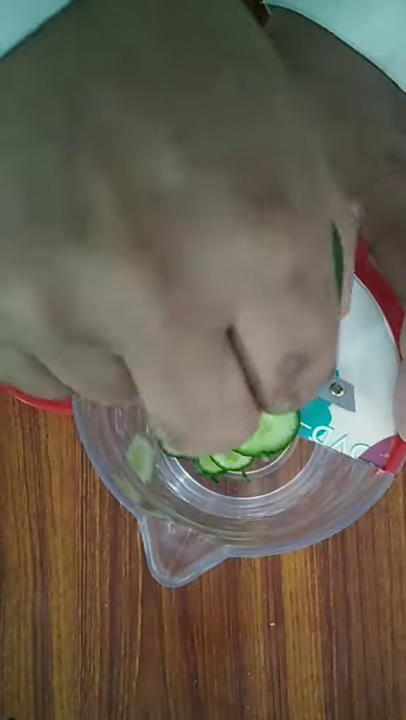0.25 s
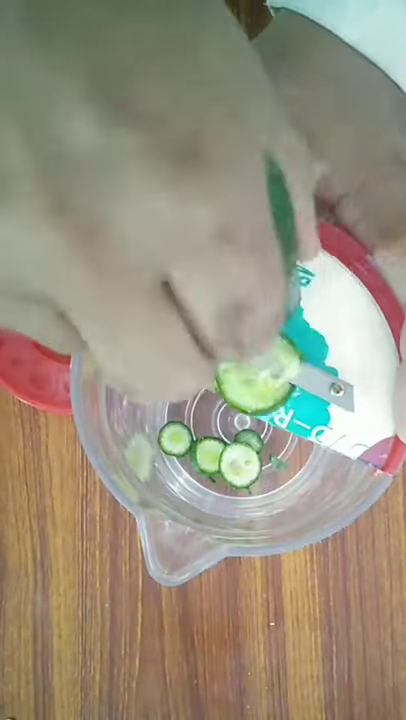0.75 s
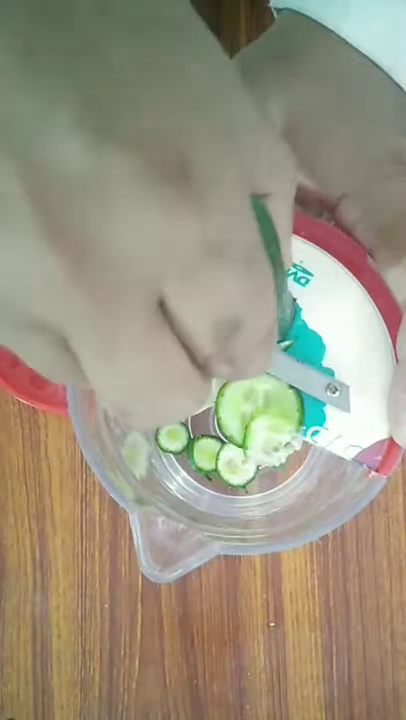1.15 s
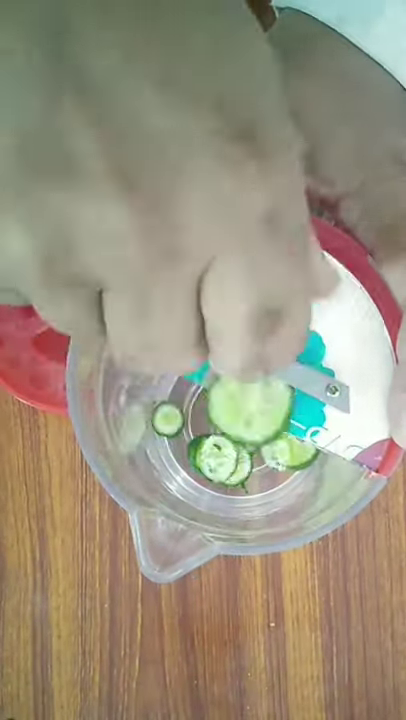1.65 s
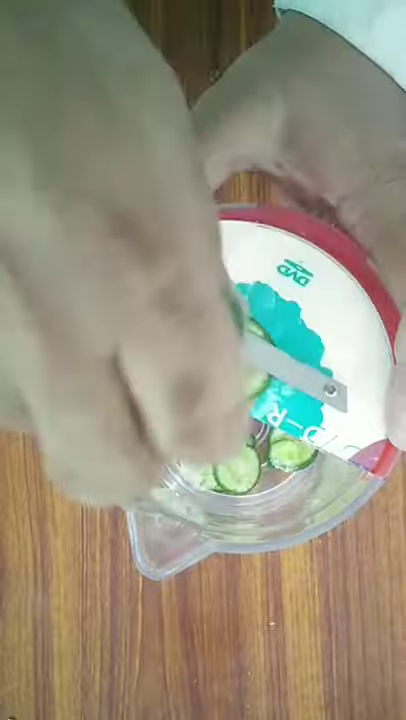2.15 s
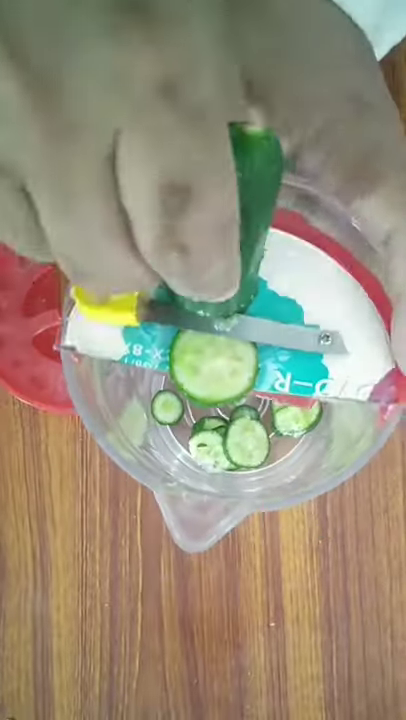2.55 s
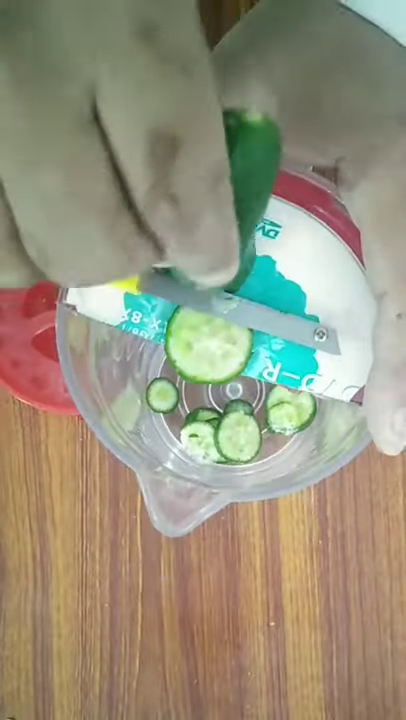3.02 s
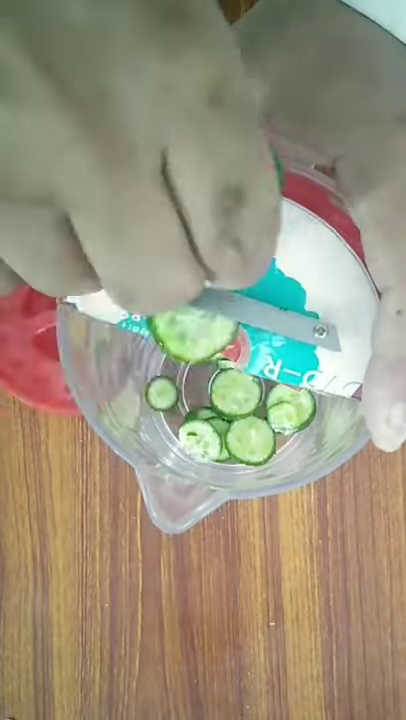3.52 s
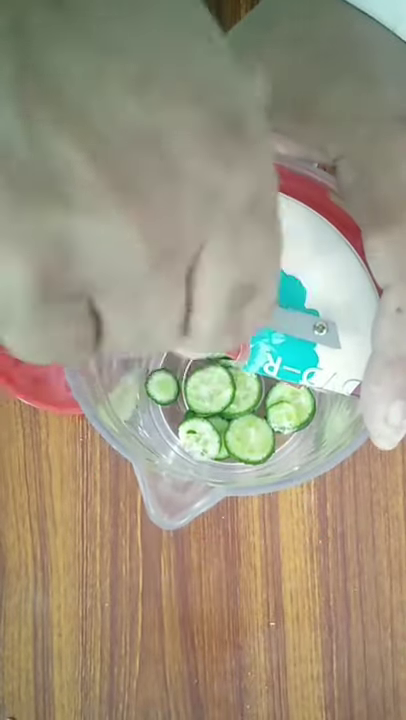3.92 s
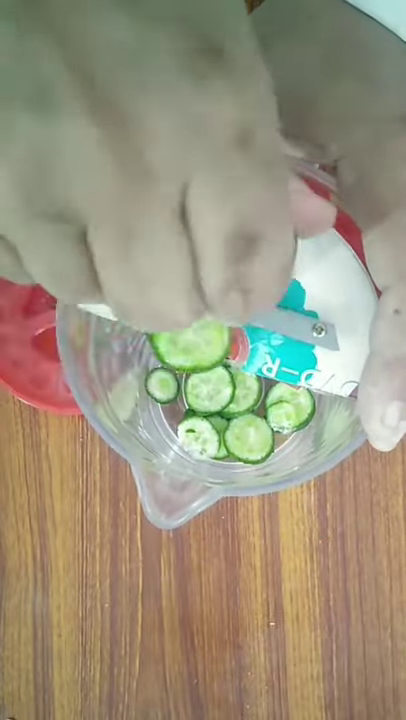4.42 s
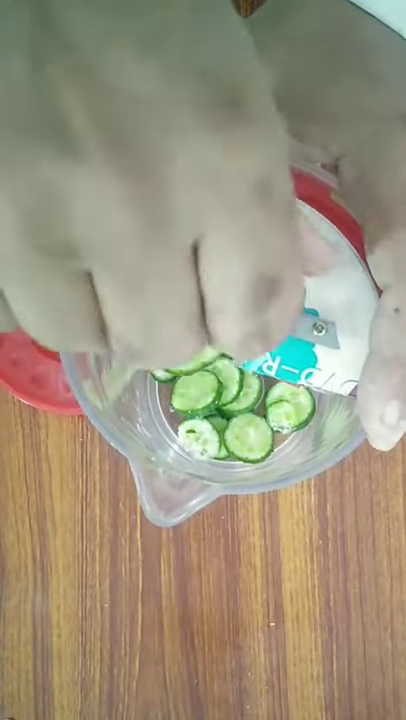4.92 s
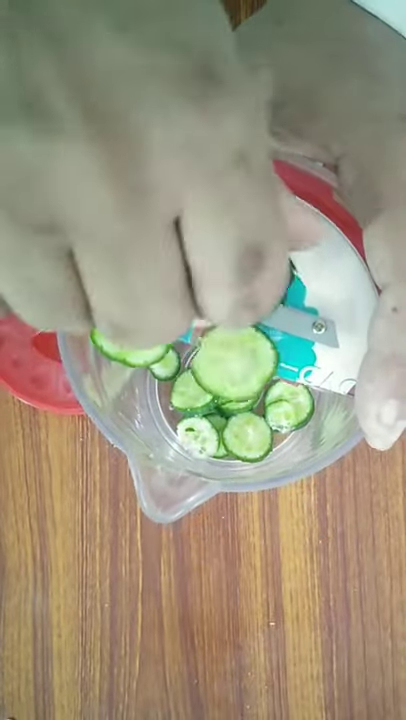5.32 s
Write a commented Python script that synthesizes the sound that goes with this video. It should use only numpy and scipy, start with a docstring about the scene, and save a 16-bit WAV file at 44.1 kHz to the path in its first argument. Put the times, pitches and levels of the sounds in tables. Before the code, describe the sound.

Close, wet rubbing and short crunchy cuts of cucumber on a thin plastic slicer, with hollow knocks, slapping slices and a steady low room hum.

```python
"""A low room hum runs throughout, and a close microphone hears a cucumber pushed to and fro over a board.
The thin plastic board holds a blade and lies on a bowl; the wet face rubs as grains of noise and squeaks.
Soon the blade crunches in as bursts of grains with ticks; the bowl knocks, and later slices slap, as tones.
Halfway the cucumber snaps with a crackling burst and a thump; then rubbing, cutting and slaps go on."""
import sys
import numpy as np
from scipy import signal
from scipy.fft import rfft, irfft, next_fast_len
from scipy.io import wavfile
from scipy.ndimage import uniform_filter1d

SR = 44100
rng = np.random.default_rng(int(sys.argv[2]) if len(sys.argv) > 2 else 0)


def put_to_file(sound):
    """Save the sound as 16-bit audio at rate SR, in the file named by the first command-line argument."""
    columns = np.atleast_2d(sound).T  # one column per channel
    safe = np.clip(columns, -1, 1)
    whole_steps = np.round(safe * 32767)
    wavfile.write(sys.argv[1], SR, whole_steps.astype(np.int16))


N = 245637  # length in samples

# colour of the blade's cutting noise: pitch_hz [Hz], level_db [relative dB]
CUT_COLOUR = [(500, 5.5), (1000, -4.5), (1800, -0.5), (3000, -0.5), (3600, -11.5), (6000, 6.5), (8200, 9),
              (9500, 0.5), (11500, -6.5), (14000, -17)]


def amp(db):
    """Turns decibels into a gain."""
    return 10 ** (np.asarray(db) / 20)


def unit(x):
    """Scales a sound to an average (rms) strength of one."""
    return x / np.sqrt(np.mean(x ** 2) + 1e-20)


def read(points, hz):
    """Reads a table of points between its frequencies, on a log-frequency axis."""
    f, value = np.transpose(points)
    return np.interp(np.log(hz + 1), np.log(f), value)


def add(mix, s, sound):
    """Mixes a sound in at time s."""
    part = mix[:, max(round(s * SR), 0):][:, :sound.shape[-1]]
    part += sound[..., :part.shape[1]]


def shaped(x, gain):
    """Filters a sound by a gain given as a function of Hz."""
    size = next_fast_len(x.shape[-1] + 2048)
    spectrum = rfft(x, size) * gain(np.fft.rfftfreq(size, 1 / SR))
    return irfft(spectrum, size)[..., :x.shape[-1]]


def peaks(x, modes):
    """Passes sound through fixed resonances, each given as pitch in Hz, width in Hz and level in dB."""
    return shaped(x, lambda f: sum(amp(db) / (1 + (2 * (f - hz) / width) ** 2) for hz, width, db in modes))


def dying(t, t60):
    """Falls by 60 dB in the time t60."""
    return np.exp(-np.log(1000) * t / t60)


def step(t, width_s):
    """Rises smoothly from 0 to 1 around t = 0."""
    return .5 + .5 * np.tanh(t / (2 * width_s))


def mode(t, hz, t60, rise):
    """Makes one ringing tone that starts softly and dies away."""
    return np.sin(2 * np.pi * hz * t) * dying(t, t60) * (1 - np.exp(-t / rise))


def grains(count, per_s, spread_db, ring_t60, shared):
    """Tiny slips and bursting cells ring the board, a little differently for each side of the microphone."""
    chance, size, sign = rng.random((3, count))
    strength = amp(spread_db * np.minimum(-np.log(1 - size), 4))
    train = np.sign(sign - .5) * strength * (chance < per_s / SR)
    t = np.arange(1024) / SR
    rings = rng.standard_normal((3, len(t))) * dying(t, ring_t60)
    shared = np.clip(shared, 0, 1)
    rings = np.sqrt(shared) * rings[0] + np.sqrt(1 - shared) * rings[1:]
    return signal.fftconvolve(train[None], rings, axes=1)[:, :count]


def patchy(x):
    """Each spot of contact favours some bands of pitch by chance."""
    spacing_hz, spread_db = 330, 2.2
    bands = np.arange(0, SR / 2, spacing_hz)
    gains_db = spread_db * rng.standard_normal(len(bands))
    return shaped(x, lambda f: amp(np.interp(f, bands, gains_db)))


def pressed(x, colour, pressure_db, split_hz=3500, low_hz=600):
    """Colours the grains; pressure couples them to the board's middle range."""
    def treble_gain(f):
        return amp(read(colour, f)) / np.sqrt(1 + (split_hz / (f + 1)) ** 12)

    def middle_gain(f):
        below_split = 1 + (f / split_hz) ** 12
        above_low = 1 + (low_hz / (f + 1)) ** 6
        return amp(read(colour, f)) / np.sqrt(below_split * above_low)

    return unit(shaped(x, treble_gain)) + amp(pressure_db) * unit(shaped(x, middle_gain))


def hum():
    """A low drone of filtered noise fills the room, most alike on both sides at low pitches."""
    # colour of the drone: pitch_hz [Hz], level_db [relative dB]
    hum_colour = [(20, -27.5), (55, -17.5), (92, -11.5), (122, 1.5), (165, 2.5), (205, -1.5), (245, -13),
                  (310, -6), (400, -12), (560, -17), (800, -25.5), (1100, -42), (1800, -47.5)]
    # slow changes of loudness: time_s [s], level_db [dB]
    hum_levels = [(0, -44), (.6, -43), (1.45, -40.5), (2.4, -43.5), (5.57, -43)]
    # how alike left and right are: pitch_hz [Hz], likeness [0-1]
    hum_likeness = [(30, 0.24), (110, 1), (300, 0.89), (700, 0.19), (2000, 0.043)]

    def same(f):
        return np.clip(read(hum_likeness, f), -1, 1)

    a, b = rng.standard_normal((2, N))
    right = shaped(a, same) + shaped(b, lambda f: np.sqrt(1 - same(f) ** 2))
    level_db = np.interp(np.arange(N) / SR, *np.transpose(hum_levels))
    drone = shaped(np.array([a, right]), lambda f: amp(read(hum_colour, f)) / np.sqrt(1 + (f / 3000) ** 2))
    return amp(level_db) * unit(drone)


def room(x):
    """The walls return a short, dull tail, made of dying noise."""
    t = np.arange(SR // 2) / SR
    tail = rng.standard_normal((2, len(t))) * dying(t, t60=0.067)
    tail = tail * (t > .005)  # the walls answer after 5 ms
    tail = shaped(tail / np.linalg.norm(tail[0]), lambda f: 1 / np.sqrt(1 + (f / 8000) ** 4))
    return signal.fftconvolve(x, tail, axes=1)[:, :N]


def squeaking():
    """Wet skin sticks and slips: a clean whistle, or when rough a waver and narrow bands of rasp."""
    # squeaks and low groans: start_s [s], length_s [s], pitch_hz [Hz], level_db [dB],
    # roughness [0-1, higher counts as 1], overtone_db [dB, each overtone over the one below]
    squeaks = [(.1, 0.11, 2800, -53.5, 0.41, -38), (.255, .072, 2830, -57.5, 0.74, -26),
               (0.38, 0.048, 804, -40.5, 0.8, -22), (1.599, 0.33, 118.6, -42.5, 0.4, -21),
               (3.074, 0.089, 6170, -53.5, 0.38, -33), (3.352, 0.47, 1535, -64.5, 0.59, -8),
               (3.259, 0.078, 2632, -52.5, 1, -24), (3.46, .2, 156, -37, 0.6, -13),
               (4.013, 0.14, 1525, -62.5, 1.2, 2.5), (4.264, 0.13, 2013, -66.5, 0.88, -3.5)]
    # pitch spread when fully rough, and rasp width, both at 1 kHz; they grow with the root of the pitch
    waver_hz, rasp_hz = 45, 118
    out = np.zeros((2, N))
    for s, length, hz, level_db, rough, overtone_db in squeaks:
        count, rough = round(length * SR), np.clip(rough, 0, 1)
        a, b = rng.standard_normal((2, SR))
        waver = unit(uniform_filter1d(a, size=400))[:count] * waver_hz * np.sqrt(hz / 1000)
        tone = np.sin(2 * np.pi * np.cumsum(hz + rough * waver) / SR)
        partials = [(k * hz, rasp_hz * np.sqrt(k * hz / 1000), overtone_db * (k - 1)) for k in range(1, 6)]
        rasp = unit(peaks(b, partials))[:count]
        squeak = unit(2 * (1 - rough) * tone + rough * rasp)
        add(out, s, amp(level_db) * squeak * signal.windows.tukey(count, .35))
    return out


def hollow_notes():
    """Damped hollow notes with noise around their pitch: slices slapping down, and one tone of a squeak."""
    # slices slapping down, and at .388 s the higher hollow tone of the low squeak:
    # start_s [s], level_db [dB], pitch_hz [Hz], t60_s [s to fall by 60 dB]
    notes = [(.388, -43, 1070, 0.11), (1.049, -34.5, 695, 0.027), (1.193, -41, 1090, 0.12),
             (1.471, -38, 1080, .06), (1.478, -34.5, 746, 0.033), (3.781, -22, 695, 0.013),
             (4.550, -19.5, 760, 0.031)]
    out, t = np.zeros((2, N)), np.arange(SR // 8) / SR
    for s, level_db, hz, t60 in notes:
        noise = unit(shaped(rng.standard_normal(len(t)), lambda f: 1 / (1 + ((f - hz) / 500) ** 2)))
        noise = noise * dying(t, t60) * (1 - np.exp(-t / 0.002))
        add(out, s, amp(level_db) * (mode(t, hz, t60, rise=0.001) + amp(-11) * noise))
    return out


def knocking():
    """The board bumps and rings the bowl; the hand shifts its pitch, and a firm grip makes it short and deep."""
    # bumps: start_s [s], level_db [dB], pitch_hz [Hz], grip of the hand [0-1]
    knocks = [(.337, -28.5, 321.6, 0.28), (.802, -33.5, 336, 0.79), (1.053, -36.5, 329, 0.27),
              (1.248, -31.5, 334, 0.75), (1.438, -32.5, 335, 0.63), (2.048, -32, 338, 0.5),
              (2.524, -27.5, 342, 0.44), (2.638, -37, 372, 0.24), (2.784, -29.5, 337.7, 0.78),
              (3.266, -33.5, 340, 0.55), (3.357, -34, 339, 0.3), (4.044, -33, 351, 0.34),
              (4.35, -34, 338.4, 0.28), (5.144, -32.5, 351.5, 0.76), (5.312, -35, 336, 0.16)]
    # the bowl's upper tones: multiple of the pitch [ratio], level_db [relative dB]
    bowl_tones = [(1.001, 2.5), (1.601, -14), (2.252, -17.5)]
    free_t60, gripped_t60 = 0.27, 0.044  # s; a firm grip damps the upper tones
    free_deep_db, gripped_deep_db = -17, 10  # and rocks the whole bowl on the table
    out, t = np.zeros((2, N)), np.arange(SR // 3) / SR
    for s, level_db, hz, grip in knocks:
        t60 = free_t60 * (gripped_t60 / free_t60) ** grip
        deep_db = free_deep_db + grip * (gripped_deep_db - free_deep_db)
        upper = sum(amp(db) * mode(t, hz * k, t60 / k, rise=0.0025) for k, db in bowl_tones)
        deep = amp(deep_db) * mode(t, hz=156.5, t60=0.049, rise=0.0014)
        add(out, s, amp(level_db) * (upper + deep))
    return out


def ticking():
    """The hard edge of blade or board cracks as a burst of noise and rings briefly."""
    # sharp ticks: start_s [s], level_db [dB], ring_hz [Hz]
    ticks = [(0.3343, -16.5, 8120), (0.3373, -17.5, 4850), (0.3382, -22, 7700), (0.937, -27.5, 6860),
             (1.2385, -31, 7930), (1.249, -25.5, 7950), (4.243, -37, 7386)]
    out, t = np.zeros((2, N)), np.arange(2048) / SR
    for s, level_db, hz in ticks:
        crack = unit(shaped(rng.standard_normal((2, len(t))), lambda f: amp(read(CUT_COLOUR, f))))
        crack = crack * dying(t, 0.021)
        ring = unit(peaks(rng.standard_normal((2, len(t))), [(hz, 900, 0)]))
        ring = ring * dying(t, 0.0085) * (1 - np.exp(-t / 0.00041))
        tone = mode(t, hz, t60=0.0088, rise=0.0001)
        add(out, s, amp(level_db) * (tone + amp(-10.5) * crack + amp(1.5) * ring))
    return out


def thumping():
    """The cucumber's end thumps down: a few broad swings of board and bowl, choked by the hand."""
    # thumps: start_s [s], length_s [s], board_hz [Hz], board_db [dB], bowl_hz [Hz], bowl_db [dB]
    thumps = [(1.0484, 0.01, 325, -25.5, 180, -34), (1.471, .04, 317, -36, 166, -27),
              (2.74, 0.0028, 330, -32, 204, -12), (2.7476, 0.026, 340, -21.5, 186, -13.5),
              (4.559, 0.013, 350, -34, 166, -22)]
    contact_s, board_t60, rock_t60 = 0.0029, 0.38, 0.062  # contact time; decays of board and rocking bowl
    out = np.zeros((2, N))
    for s, length, board_hz, board_db, bowl_hz, bowl_db in thumps:
        t = np.arange(0, length, 1 / SR)
        board_swing = amp(board_db) * mode(t, board_hz, board_t60, contact_s / 2)
        bowl_swing = amp(bowl_db) * mode(t, bowl_hz, rock_t60, contact_s / 2)
        add(out, s, (board_swing + bowl_swing) * np.tanh((length - t) / contact_s) ** 2)
    return out


def crunching(rows, colour, count):
    """Bursts of breaking cells, at count places along the cut, swell and fade as the flesh gives way."""
    out = np.zeros((2, N))
    for s, level_db, rise, fall, pressure_db in rows:
        t = np.arange(-SR // 16, SR // 8) / SR  # zero at the peak
        cells = sum(patchy(grains(len(t), per_s=4500 / count, spread_db=3.0, ring_t60=.009, shared=.25))
                    for _ in range(count))
        swell = np.exp(-np.where(t < 0, (t / rise) ** 2, t / fall))
        add(out, s + t[0], amp(level_db) * swell * pressed(cells, colour, pressure_db))
    return out


def snapping():
    """The cucumber splits at once, then its last fibres give way, a little louder on the left."""
    # splits: peak_s [s], level_db [dB], rise_s [s], fall_s [s], pressure_db [dB, middle over treble]
    splits = [(2.734, -18.5, 0.0041, 0.0081, -11.5), (2.752, -29, 0.0067, 0.0074, -4.5),
              (2.767, -35, 0.0092, 0.0016, -5.5)]
    # colour of the snap: pitch_hz [Hz], level_db [relative dB]
    split_colour = [(400, -9.5), (900, -6.5), (1300, 3), (1700, -4.5), (2400, 2), (3200, -4), (3900, 1.5),
                    (6200, 5), (8250, 4), (9300, -4.5), (14000, -31)]
    return amp([[2.0], [0.0]]) * crunching(splits, split_colour, count=6)


def juice(cutting):
    """Juice is squeezed out in tiny ringing bubbles that follow the middle-range strength of the cutting."""
    lowest_hz, range_octaves, ring_cycles, per_s = 1003, 2, 11, 350
    middle = shaped(cutting.mean(0), lambda f: (f > 900) & (f < 3500))
    force = np.sqrt(abs(uniform_filter1d(middle ** 2, size=300)))
    out, t = np.zeros((2, N)), np.arange(800) / SR
    for when, pitch, size, side in rng.random((round(per_s * N / SR), 4)):
        cycles = lowest_hz * 2 ** (range_octaves * pitch) * t
        bubble = np.sin(2 * np.pi * cycles) * dying(cycles, ring_cycles)
        add(out, when * N / SR, size ** 2 * np.sqrt([[side], [1 - side]]) * bubble)
    return amp(-12.5) * force * unit(out)


def blade():
    """The blade bites wet flesh, longer bites also gathering longer, and tears tough skin in bright rasps."""
    # bites: peak_s [s], level_db [dB], fall_s [s]
    bite_rows = [(0.337, -40.5, 0.0038), (.254, -46, .006), (0.806, -48.5, 0.012), (1.028, -39.5, .018),
                 (1.197, -42.5, 0.015), (1.572, -44.5, 0.0056), (1.59, -53.5, 0.017), (1.677, -46, 0.0065),
                 (1.7, -51, 0.012), (1.987, -47.5, .014), (2.046, -45, 0.016), (2.619, -59, 0.0022),
                 (2.887, -44, 0.006), (3.699, -53, 0.01), (3.888, -49, 0.027), (4.43, -47, 0.0031),
                 (4.541, -41, 0.028), (4.844, -48, 0.03), (4.918, -48.5, 0.026), (5.094, -43.5, 0.018),
                 (5.418, -46.5, 0.016)]
    # tears: peak_s [s], level_db [dB]
    tear_rows = [(0.32, -48.5), (0.896, -34), (1.248, -35.5), (2.132, -44.5), (3.348, -37.5), (4.85, -51)]
    # colour of the tearing skin: pitch_hz [Hz], level_db [relative dB]
    skin_colour = [(500, -1), (1800, 6), (3000, 2.5), (3600, -4), (6000, 5.5), (8200, 9.5), (9500, 4),
                   (11500, -5), (14000, -7)]
    # filled up to: peak s, level dB, rise s, fall s, pressure dB
    bites = [(s, level_db, .38 * fall, fall, 1) for s, level_db, fall in bite_rows]
    tears = [(s, level_db, 0.014, 0.013, -5.5) for s, level_db in tear_rows]
    return crunching(bites, CUT_COLOUR, count=2) + crunching(tears, skin_colour, count=3)


def rubbing():
    """The wet face slips over the board in tiny grains, catching unevenly, crackling and ringing the board."""
    # strokes: start_s [s], end_s [s], level_db [dB], pressure_db [dB, middle over treble],
    # drag_s [s, light drag afterwards]
    strokes = [ (0.105, 0.19, -67.5, -9, 0), (0.201, 0.422, -58, 2.5, 0.037), (0.728, 0.768, -57, 1, 0.051),
               (0.871, 1.063, -56, 1, 0.011), (1.183, 1.283, -52, -1.5, 0.023),
               (1.389, 1.518, -55, 4, 0.033), (1.658, 1.749, -57.5, 2.5, 0.03),
               (1.789, 1.901, -61.5, -18, 0.08), (1.975, 2.179, -55.5, 1.5, 0.084),
               (2.319, 2.42, -53, -6.5, 0.033), (2.467, 2.588, -52, -6, 0.053),
               (2.619, 2.667, -46, -3.5, 0.014), (2.765, 3.07, -60.5, 2, 0.0013),
               (3.069, 3.157, -55.5, 3.5, 0.1), (3.264, 3.386, -54, 4, 0.053),
               (3.545, 3.734, -56.5, 4, 0.098), (3.864, 3.99, -61, -0.5, 0.09),
               (4.191, 4.258, -57, -1, 0.047), (4.39, 4.442, -57, -2, 0), (4.447, 4.503, -50, 5.5, 0.018),
               (4.528, 4.659, -52.5, -1.5, 0.043), (4.801, 4.884, -58, 4, 0.077),
               (4.99, 5.043, -57.5, 7.5, 0.13), (5.301, 5.365, -53.5, 5, 0.18)]
    # colour of the rubbing: pitch_hz [Hz], level_db [relative dB]
    rub_colour = [(500, 12), (1000, 4), (1350, 1.5), (2000, 2), (2750, 1.5), (3600, -10.5), (4500, -3),
                  (6500, 6), (8100, 0), (9300, -3.5), (14000, -19)]
    # a light touch lets the thin board ring: pitch_hz [Hz], width_hz [Hz], level_db [relative dB]
    board_rings = [(1436, 43, -26.5), (3000, 220, 1), (4100, 430, 1.5), (7120, 830, 4.5), (8410, 420, 1)]
    grab_s, release_s = 0.0089, 0.0069  # the face takes hold of the board and lets go
    spot_s = .06  # the face reaches another spot of the board in this time
    middle_db, catch_db = -0.5, 2.5  # slight dip in mid-stroke; uneven catching
    drag_db, drag_ring_db = -10.5, -13  # rasp and ring of a light drag against the stroke
    out = np.zeros((2, N))
    for start, end, level_db, pressure_db, drag_s in strokes:
        t = np.arange(start - .06, end + drag_s + .1, 1 / SR)
        spot = np.maximum(t - start, 0) / spot_s
        slips = 0
        for k in range(int(spot[-1]) + 2):
            fade = np.cos(np.clip(spot - k, -1, 1) * np.pi / 2)  # from one spot into the next
            spot_grains = grains(len(t), per_s=3200, spread_db=2.0, ring_t60=0.018, shared=0.24)
            slips = slips + fade * unit(patchy(spot_grains))
        travel = np.clip((t - start) / (end - start), 0, 1)
        pushed, dragged = step(end - t, release_s), step(end + drag_s - t, release_s)
        catch = uniform_filter1d(rng.standard_normal(len(t)), size=450)
        catch = unit(uniform_filter1d(catch, size=90))
        # single cells burst
        crackle = amp(-5) * unit(grains(len(t), per_s=170, spread_db=3, ring_t60=.003, shared=.5))
        rasp_gain = amp(level_db + middle_db * np.sin(np.pi * travel))
        rasp = rasp_gain * pressed(slips + crackle, rub_colour, pressure_db)
        # pressing harder damps the board, so its ring grows far less than the rasp; each grip retunes it
        retuned = [(hz * rng.uniform(.93, 1.07), width, db) for hz, width, db in board_rings]
        ring = amp(0.37 * level_db - 41.0) * unit(peaks(slips, retuned))
        sound = rasp * np.maximum(pushed, amp(drag_db) * dragged)
        sound = sound + ring * np.maximum(pushed, amp(drag_ring_db) * dragged)
        add(out, t[0], step(t - start, grab_s) * amp(catch_db * catch) * sound)
    return out


def past_hand(x, echo=0.4, near_s=0.00021, far_s=0.000891):
    """The moving hand reflects sound to each side with a drifting delay, so the colour keeps shifting."""
    t, knots = np.arange(N) / SR, np.arange(0, N / SR + 1, .13)
    delays = rng.uniform(near_s, far_s, (2, len(knots)))
    bounced = [np.interp(t - np.interp(t, knots, delay), t, side) for delay, side in zip(delays, x)]
    return (x + echo * np.array(bounced)) / np.hypot(1, echo)


def scene():
    """The slicer sounds close by, in a small humming room."""
    cutting = past_hand(rubbing() + blade())
    slicer = cutting + juice(cutting) + snapping() + thumping()
    slicer = slicer + ticking() + knocking() + hollow_notes() + squeaking()
    slicer = shaped(slicer, lambda f: 1 / np.sqrt(1 + (85 / (f + 1)) ** 4))  # a small bowl radiates no deep bass
    return slicer + amp(-10.5) * room(slicer) + hum()


def record(dry):
    """The microphone's left side is the brighter one; then the highest treble is cut off."""
    # left against right: pitch_hz [Hz], level_db [dB, left over right]
    left_over_right = [(100, 1.5), (1200, 4.5), (6000, 1.5), (7000, 2.5), (8200, 15), (10000, 11.5),
                       (14000, 11)]

    def sides(f):
        pair = amp(np.array([[.5], [-.5]]) * read(left_over_right, f))
        return pair / pair.mean(0)

    edge_hz = 14600
    low_pass = signal.firwin(255, edge_hz, window=("kaiser", 9), fs=SR)
    return signal.oaconvolve(shaped(dry, sides), low_pass[None], "same")


dry = scene()
out = record(dry)
put_to_file(out)
```